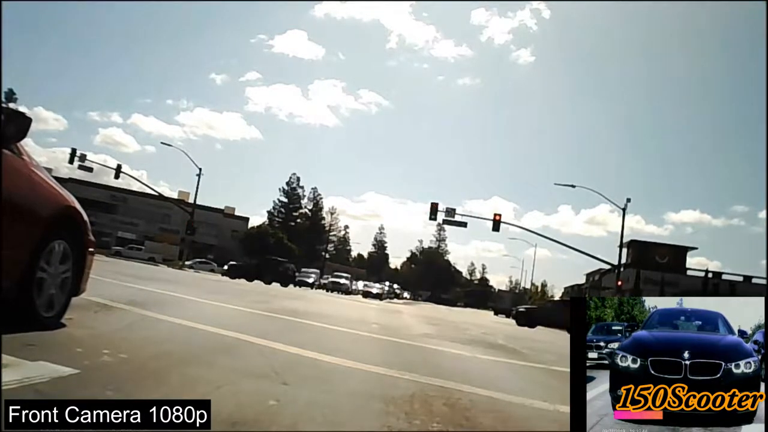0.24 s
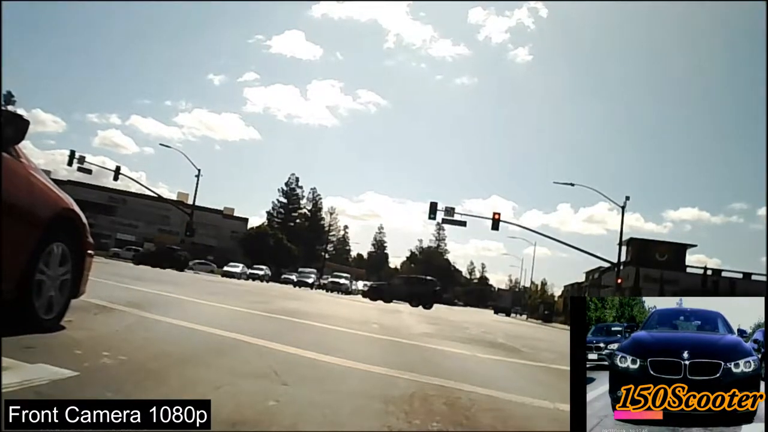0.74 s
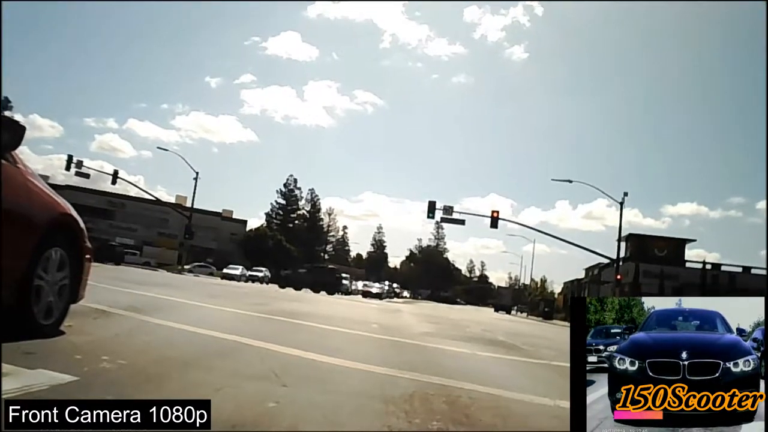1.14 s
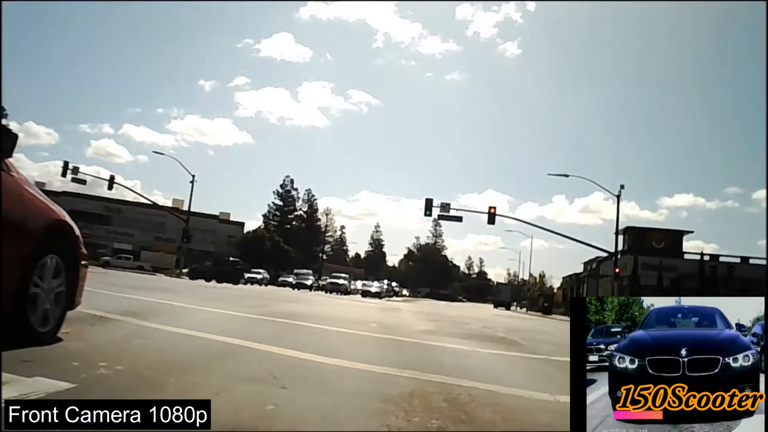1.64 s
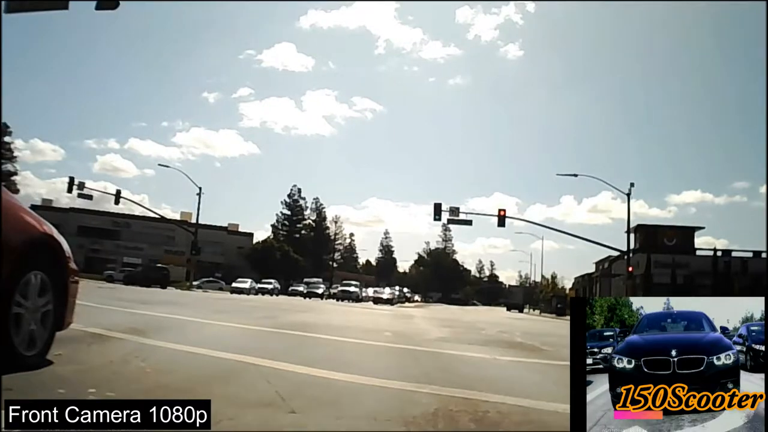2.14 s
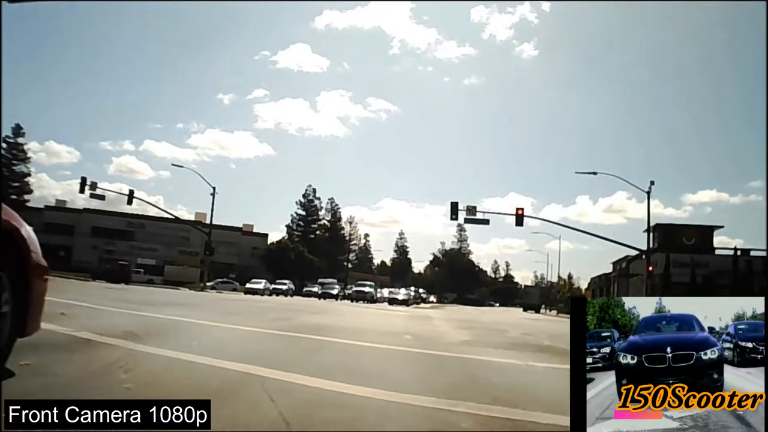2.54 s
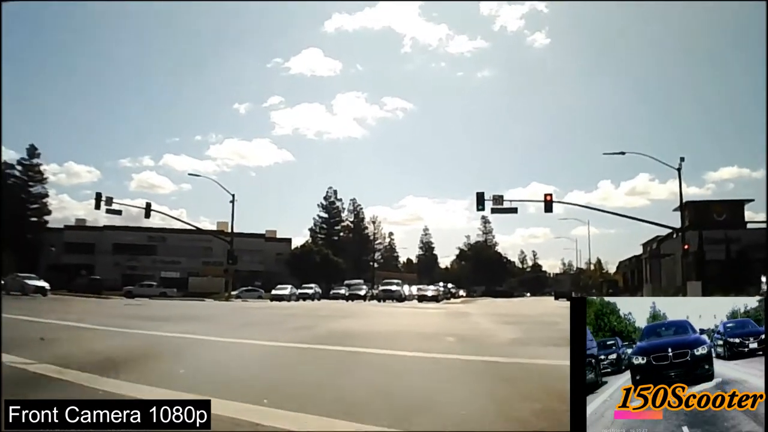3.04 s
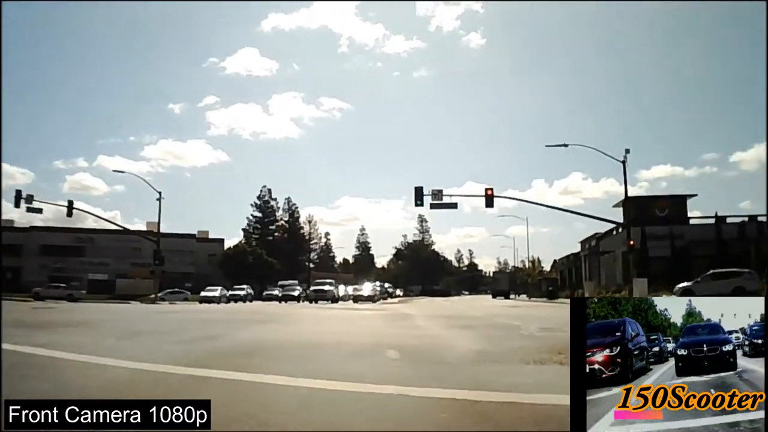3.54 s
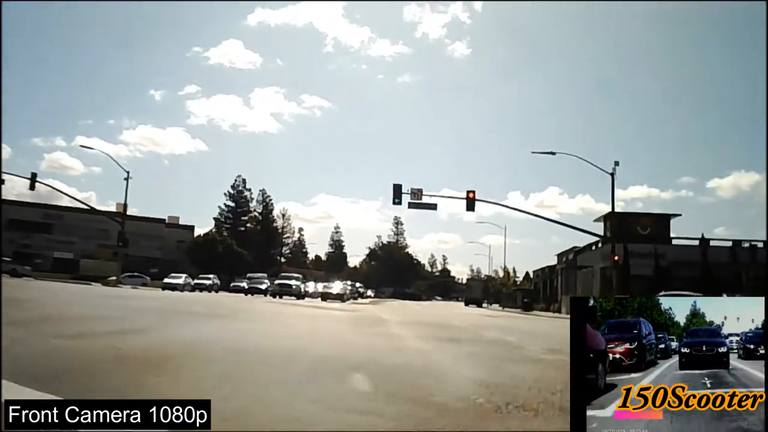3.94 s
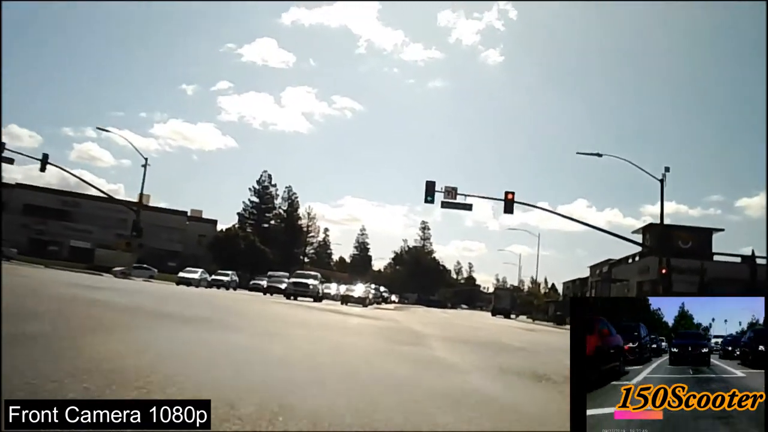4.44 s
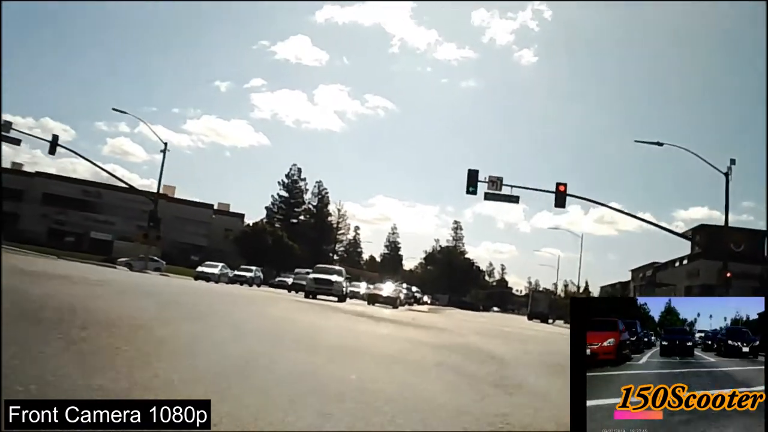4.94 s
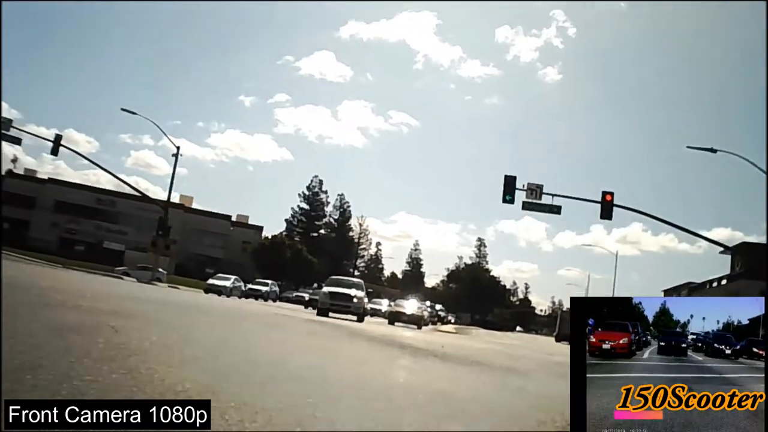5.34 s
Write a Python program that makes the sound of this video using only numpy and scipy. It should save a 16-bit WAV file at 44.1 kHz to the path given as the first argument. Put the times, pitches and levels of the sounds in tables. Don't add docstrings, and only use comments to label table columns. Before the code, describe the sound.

A small scooter engine putters quietly at idle for two seconds, then surges into a loud, rattling, distorted roar that climbs in pitch.

```python
import sys
import numpy as np
from scipy import signal
from scipy.io import wavfile
from scipy.ndimage import uniform_filter1d

SR = 44100
rng = np.random.default_rng(int(sys.argv[2]) if len(sys.argv) > 2 else 0)


def elevation(decibels):
    levels = np.asarray(decibels, float)
    return 10 ** (levels / 20)


def wav_out(sig):
    wavfile.write(sys.argv[1], SR, np.round(np.clip(np.atleast_2d(sig).T, -1, 1) * 32767).astype(np.int16))


N = 246519
TIME_S = np.arange(N) / SR

# (frequency [Hz], density [dB per Hz])
STREET_SPECTRUM = [(12, -31), (20, -10.5), (53, 7), (266, -1.5), (478, -30), (1300, -16), (1450, -41),
                   (2330, -43.5), (2840, -72), (3540, -49.5), (5090, -63.5), (5850, -61.5), (15500, -82.5)]
# (frequency [Hz], width [Hz], level [dB])
HISS_BANDS = [(9000, 3000, -2), (12400, 5000, 0)]
# (frequency [Hz], level [dB rms])
WHINES = [(8000, -95), (9222, -94), (10750, -103)]

# (time [s], speed [cycles/s])
ENGINE_SPEED = [(0.0, 12.85), (0.7, 12.58), (1.0, 13.53), (1.6, 12.24), (1.8, 12.72), (2.1, 13.0),
                (2.2, 18.45), (2.4, 23.78), (2.47, 33.57), (2.55, 32.93), (2.65, 35.35), (3.0, 34.51),
                (3.4, 33.04), (3.97, 32.21), (4.47, 33.17), (4.83, 37.14), (5.17, 39.99), (5.59, 40.44)]
# (time [s], level [dB])
ENGINE_PULL = [(2.1, -1), (2.38, 6), (2.45, 1.5), (2.55, 0.5), (2.72, 1.5), (3.05, 2.5), (3.3, 1),
               (3.51, -1.5), (3.59, 3), (3.67, -3.5), (3.95, -0.5), (4.2, -1.5), (4.5, 0.5), (4.65, 1.5),
               (4.87, 3), (5.05, -0.5), (5.59, -3.5)]
# (time [s], dip [dB])
MISFIRE_DIPS = [
    (2.932, -6.5),
    (4.909, -7.5),
]
# (time [s], level [dB])
DRIVE_SLACK = [(2.1, -22), (2.45, 8), (2.72, 8), (2.78, -6), (3.25, -4), (3.8, 8), (4.15, 6), (4.55, -12),
               (4.9, -10), (5.1, 0)]
# (time [s], strength [dB])
DRIVE_JOLTS = [(2.358, 9), (2.398, 9.5), (2.487, 12.5), (2.946, 1.5), (3.562, 5), (4.301, 5.5),
               (4.928, 3.5), (5.3, 2.5), (5.325, 2.5)]
# (time [s], peak [dB])
BELT_SLAPS = [
    (2.1212, -32),
    (2.1847, -34.5),
]
# (multiple of the cycle [1], clutch slipping [dB], clutch gripped [dB], lag [cycles])
PISTON_ORDERS = [(1, -16, -12, .25), (3, -14, -24.5, 0.2), (4, -24, -9, 0.14), (6, -19, -7.5, .16),
                 (7, -18.5, -16.5, 0.066), (8, -8, -6, 0.1016), (10, -16, -27, 0.085)]

# (frequency [Hz], width [Hz], level [dB])
SILENCER_MODES = [(54.6, 67, 1), (132, 69, -0.5), (263, 33, -7.5)]
BELT_MODES = [(2110, 610, 12.5), (2630, 1500, -13), (3900, 1200, -4), (1130, 500, 11.5)]
VALVE_MODES = [(3460, 910, 3), (4350, 620, -5), (5010, 340, -16), (5780, 470, -9), (6460, 700, -15),
               (7250, 790, -17.5), (8950, 2400, -19), (12500, 4000, -26.5)]
PANEL_MODES = [(696, 480, 5), (1172, 400, -0.5), (1317, 200, 0.5), (1615, 190, -3.5), (1871, 410, -6),
               (2340, 780, -9)]
CRACK_MODES = [(4330, 1170, 2), (7800, 5000, -16), (13000, 7400, -21)]
FRAME_MODES = [(53.7, 86, -4.5), (133, 99, -16.5), (190, 125, -6), (244.7, 65.6, -1.5), (310.5, 25, -6.5)]
MOUNT_MODES = [(43.7, 34.6, -9), (143.5, 44, -12), (268, 200, 3.5)]
BRACKET_MODES = [(388.7, 235, 6.5), (1073, 217, 2.5), (1550, 480, -15)]


def walk(rate_hz):
    hold = int(SR / rate_hz)
    steps = np.repeat(rng.standard_normal(N // hold + 1), hold)
    return 0.94 * uniform_filter1d(uniform_filter1d(steps, hold), hold)[:N]


def noise():
    return rng.standard_normal(N)


def unit(x):
    return x / np.sqrt(uniform_filter1d(x ** 2, size=SR // 4) + 1e-18)


def curves(table):
    time_s, *columns = np.transpose(table)
    return [np.interp(TIME_S, time_s, column) for column in columns]


def ramp(start_s, takes_s):
    return np.clip((TIME_S - start_s) / takes_s, 0, 1)


def bump(centre_s, spread_s):
    return np.exp(-((TIME_S - centre_s) / spread_s) ** 2)


def ring(x, modes, passes, flip=-1):
    out = 0
    for k, (hz, width_hz, db) in enumerate(modes):
        y = x
        for _ in range(passes):
            y = signal.lfilter(*signal.iirpeak(hz, hz / width_hz, SR), y)
        out = out + flip ** k * elevation(db) * np.sqrt(100 / width_hz) * y
    return out


def linger(x, decay_s):
    return signal.lfilter([1], [1, -np.exp(-1 / (decay_s * SR))], x)


def push(x, contact_s):
    return signal.fftconvolve(x, np.hanning(int(contact_s * SR)))[:N]


def blows(turn, at, late, scatter_db):
    cycles = np.arange(-1, int(turn[-1]))
    chance = rng.standard_normal((len(cycles), 2))
    where = np.searchsorted(turn, cycles + at + late * chance[:, 0])
    out = np.zeros(N + 1)
    out[where] = elevation(scatter_db * chance[:, 1])
    out[0] = 0
    return out[:N]


def electronics():
    whines = sum(np.sqrt(2) * elevation(db) * np.sin(2 * np.pi * hz * TIME_S) for hz, db in WHINES)
    return whines + elevation(-90.5) * unit(ring(noise(), HISS_BANDS, 1))


def street():
    out, swell_db = 0, walk(0.28)
    hz_points, db_points = np.transpose(STREET_SPECTRUM)
    for hz in 22 * 2 ** (np.arange(19) / 2):
        sos = signal.butter(2, [hz / 1.202, hz * 1.183], "band", fs=SR, output="sos")
        band = signal.sosfilt(sos, noise())
        band_db = np.interp(np.log(hz), np.log(hz_points), db_points)
        out = out + band * elevation(band_db + swell_db + 0.66 * walk(3.6))
    return out * elevation(-32.5) / np.std(out)


def silencer(turn):
    pulses = push(blows(turn, .71, late=.015, scatter_db=1.8), .006)
    chuff = ring(pulses, SILENCER_MODES, 1, flip=0.81)
    return elevation(-33.0) * chuff / np.std(chuff)


def belt():
    hits = np.zeros(N)
    for s, db in BELT_SLAPS:
        hits[int(s * SR)] = elevation(db + 4)
    return ring(linger(hits, 0.018) * noise(), BELT_MODES, 2)


def valves(turn, knocks, blow_db):
    seatings = blows(turn, .975, late=0.0066, scatter_db=1.2)
    seat = unit(linger(linger(seatings, 0.005), 0.0015))
    shaken = elevation(12 + 0.6 * (blow_db + 16)) * unit(push(linger(knocks, 0.006), 0.003))
    chatter = elevation(6 + .24 * (blow_db + 16) + walk(50))
    clatter = (seat + shaken + chatter) * noise()
    whirr = elevation(-6) * unit(ring(noise(), VALVE_MODES[:2], 2))
    metal = unit(ring(clatter, VALVE_MODES, 2))
    casing = elevation(2.5) * unit(ring(clatter, PANEL_MODES[3:], 2))
    return whirr + metal + casing


def panels(knocks, blow_db):
    chatter = elevation(4.5 + 0.73 * walk(40))
    bursts = elevation(0.19 * (blow_db + 17)) * unit(push(linger(knocks, 0.0032), 0.0018))
    return unit(ring((chatter + bursts) * noise(), PANEL_MODES, 2))


def crack(knocks, blow_db):
    edge = unit(push(linger(knocks ** 1.4, 0.0028), 0.00076)) * noise()
    crack_db = -35.5 + blow_db + 1.3 * (blow_db + 15.5)
    return elevation(crack_db) * unit(ring(edge, CRACK_MODES, 1))


def frame(knocks):
    jolt = (0.073 + unit(linger(knocks, 0.013))) * noise()
    return unit(ring(jolt, FRAME_MODES, 2))


def mount(knocks, blow_db):
    thud = unit(ring(push(knocks, 0.003), MOUNT_MODES, 1, flip=0.6))
    clang = unit(ring(push(knocks, 0.0004), BRACKET_MODES, 2, flip=0.7))
    return -elevation(blow_db) * (thud + elevation(-4.5 + 0.63 * (blow_db + 14)) * clang)


def shake(turn, upper_db, grip):
    out = np.cos(4 * np.pi * (turn - .2)) * elevation(1.43 * walk(14))
    for multiple, slip_db, grip_db, lag in PISTON_ORDERS:
        db = slip_db + grip * (grip_db - slip_db) + upper_db + (2.2 - 1.4 * grip) * walk(9)
        wander_rad = 0.5 * (1 - .5 * grip) * walk(8.4)
        out = out + elevation(db) * np.cos(2 * np.pi * multiple * (turn - lag) + wander_rad)
    return np.sqrt(2) * out


def firing_knocks(turn, speed):
    early = turn + .12 * np.clip((speed - 13) / 20, 0, 1)
    exhaust_db = curves(DRIVE_SLACK)[0]
    knocks = blows(early, .765, late=.025, scatter_db=1.3)
    knocks = knocks + elevation(exhaust_db) * blows(early, .32, late=.025, scatter_db=2)
    for s, db in DRIVE_JOLTS:
        knocks[int(s * SR)] += elevation(db)
    return knocks


def scene():
    speed = curves(ENGINE_SPEED)[0]
    turn = -.67 + np.cumsum(speed) / SR
    throttle = ramp(2.146, 0.4)
    pull_db = curves(ENGINE_PULL)[0] + sum(db * bump(s, 0.018) for s, db in MISFIRE_DIPS)

    def part_db(idle_db, ride_db, db_per_pull_db):
        return idle_db + (ride_db - idle_db) * throttle + db_per_pull_db * pull_db

    bite_s, bite_takes_s = 2.51, 0.046
    shake_db = part_db(-36.5, -22, 0.71) + 9.5 * ramp(bite_s, bite_takes_s)
    shake_db = shake_db - 0.23 * np.maximum(speed - 33.5, 0)
    shake_db = shake_db + 10.5 * bump(2.33, .06)
    blow_db = part_db(-43.5, -17, 1.06)
    rumble_db = part_db(-39.5, -22, 1.63)
    rattle_db = part_db(-47, -29.5, 0.22)
    valve_db = part_db(-66, -53.5, 0.59) + 4 * ramp(bite_s - bite_takes_s, bite_takes_s)
    gain_per_s = uniform_filter1d(np.clip(np.gradient(speed) * SR, 0, 10), size=SR // 10)
    upper_db = -6 + 5 * throttle - 0.16 * gain_per_s
    grip = ramp(4.75, 0.4)

    knocks = firing_knocks(turn, speed)
    out = street() + silencer(turn) + belt()
    out = out + elevation(valve_db) * valves(turn, knocks, blow_db)
    out = out + elevation(rattle_db) * panels(knocks, blow_db)
    out = out + crack(knocks, blow_db)
    out = out + elevation(rumble_db) * frame(knocks)
    out = out + mount(knocks, blow_db)
    out = out + elevation(shake_db) * shake(turn, upper_db, grip)
    return out[None]


def roll_off(x):
    return signal.sosfilt(signal.butter(12, 15740, fs=SR, output="sos"), x)


def record(dry):
    ceiling = .425
    x = dry / ceiling
    x = ceiling * x / (1 + np.abs(x) ** 20) ** (1 / 20)
    x = signal.lfilter(*signal.butter(1, 4.0, "high", fs=SR), x)
    x = x - 0.0051 - .12 * uniform_filter1d(x ** 2, size=SR // 10)
    x = (x + electronics()) * (1 - ramp(N / SR - .004, .004))
    return roll_off(x)


dry = scene()
out = record(dry)
wav_out(out)
```